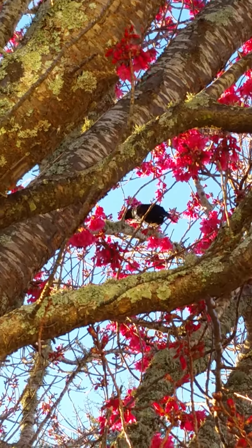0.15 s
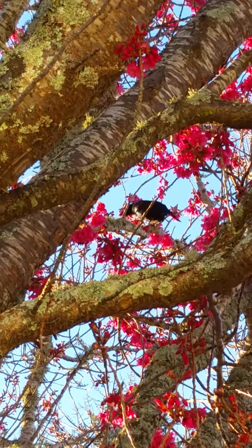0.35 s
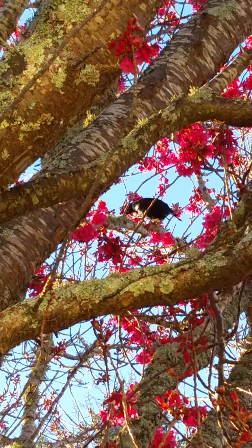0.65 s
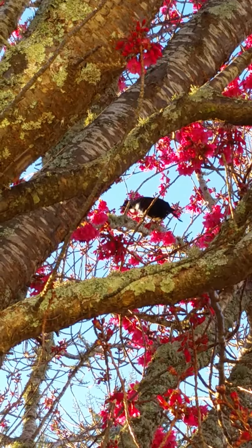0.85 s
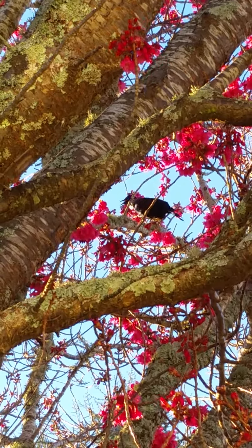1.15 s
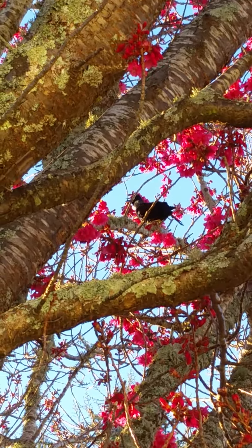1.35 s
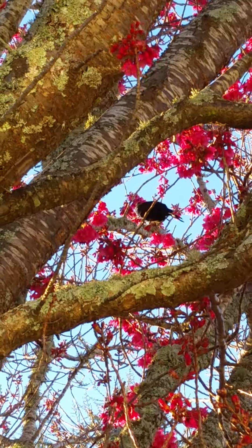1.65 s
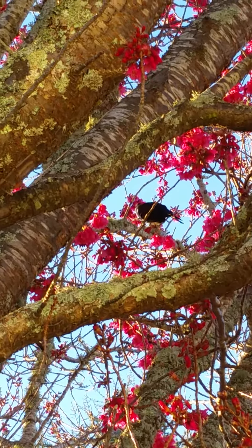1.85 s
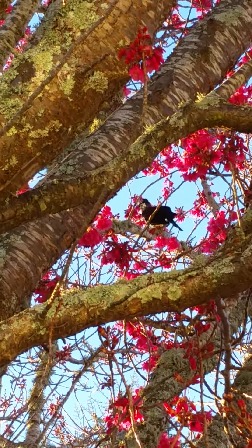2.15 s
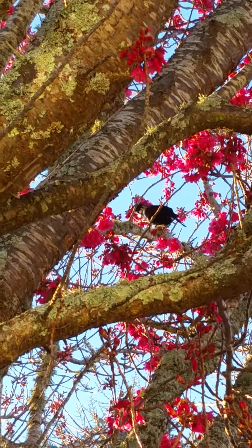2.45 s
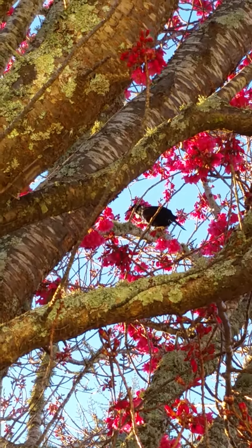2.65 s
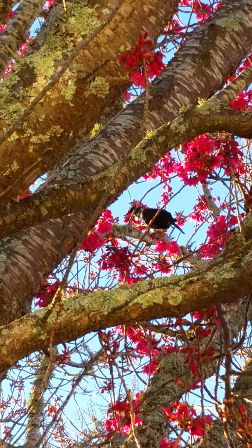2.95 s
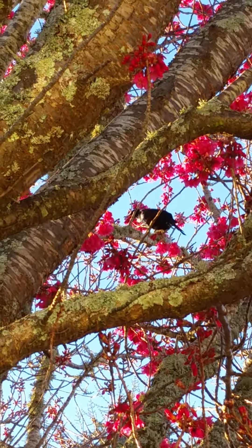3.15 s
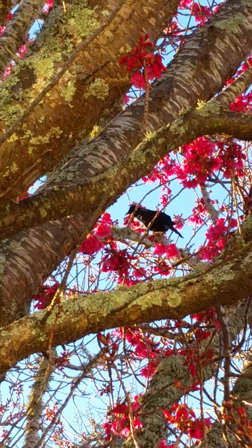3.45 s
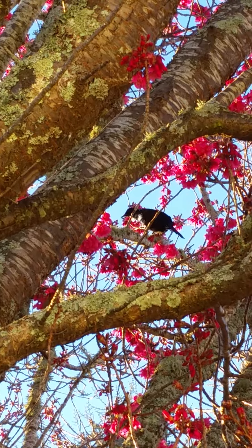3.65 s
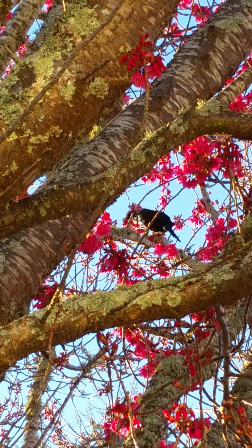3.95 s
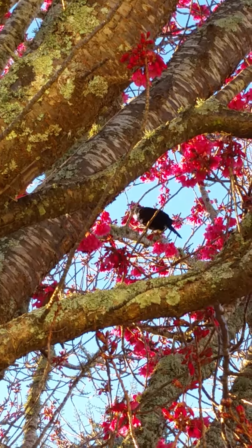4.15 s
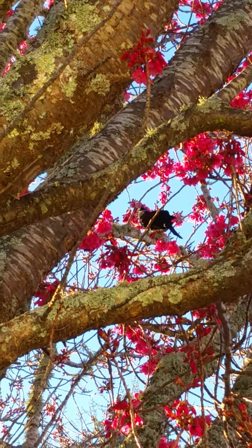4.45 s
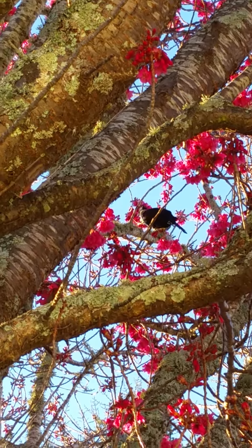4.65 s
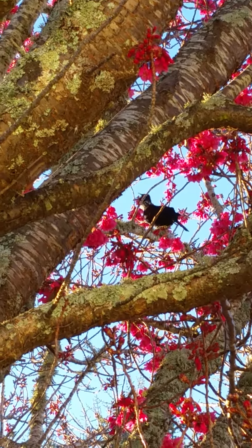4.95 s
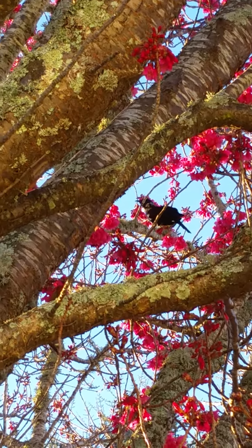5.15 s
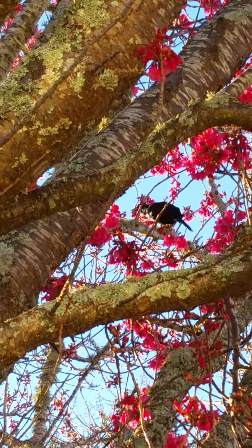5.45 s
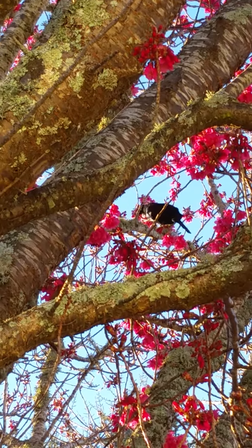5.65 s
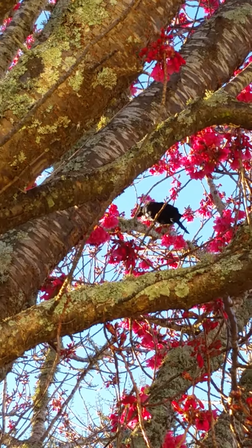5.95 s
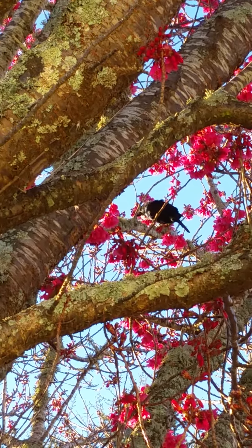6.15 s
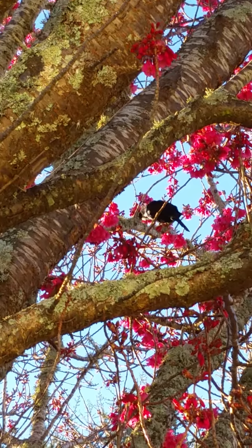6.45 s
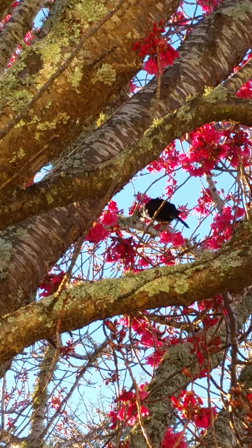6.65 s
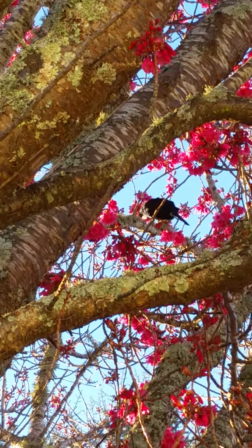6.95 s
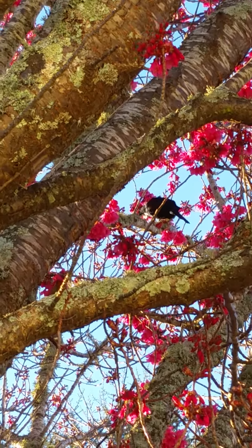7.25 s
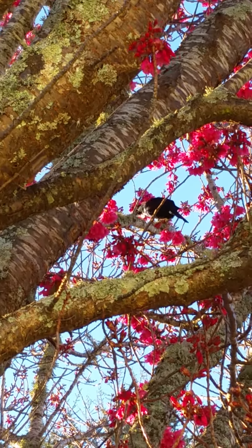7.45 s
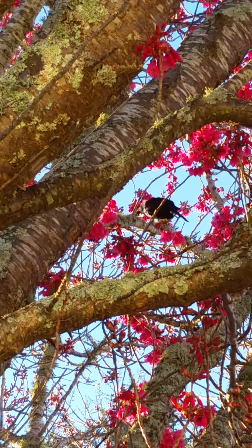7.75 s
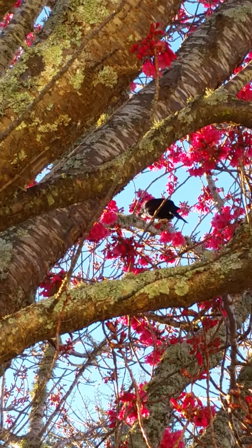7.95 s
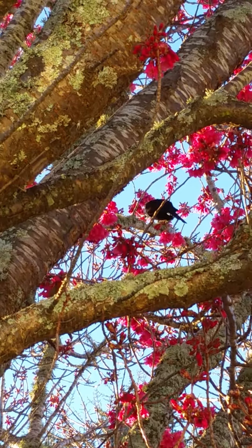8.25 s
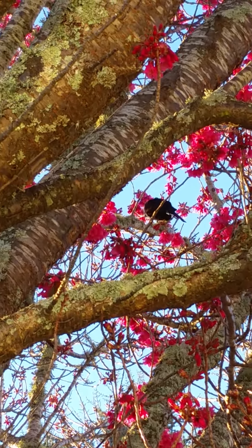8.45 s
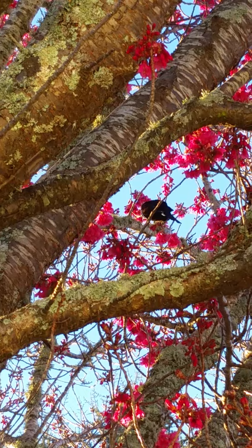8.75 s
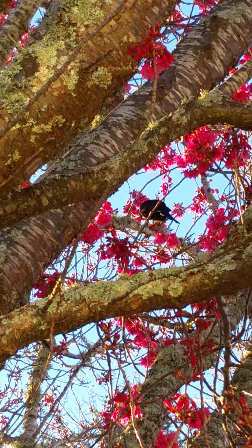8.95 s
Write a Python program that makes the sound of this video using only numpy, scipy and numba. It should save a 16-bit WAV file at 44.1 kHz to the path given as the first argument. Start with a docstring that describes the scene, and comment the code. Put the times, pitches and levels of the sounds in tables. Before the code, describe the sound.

Outdoor stereo phone pickup, bird several metres away and slightly to the right. A snap and chirp lead to a bright double whistle between hoarse, rattling wheezes; low, round notes follow, then another wheeze, one strong whistle and another rasp. A rapid stuttering run comes near six seconds, then faint high squeals and scratchy chirps. Dull rumble lies beneath, with low wind bumps stronger on the left and a quiet engine drone gliding upward.

```python
"""A songbird sings to the right of a phone: the membranes of its syrinx whistle, rasp and chirp, its beak clicks.
Whistles are gliding near sines; rasps are slow beats filling two resonances, with noise hissing through the throat.
Branches scatter the song, walls return dull echoes and a yard prolongs it through coupled delay lines.
Wind buffets the two microphone ports as filtered noise and thumps; far traffic drones as bands of noise,
and the hum of an engine rises slowly in pitch."""
import sys
import numpy as np
from scipy import signal
from scipy.io import wavfile
from scipy.ndimage import uniform_filter1d, map_coordinates
from numba import njit

SR = 44100
rng = np.random.default_rng(int(sys.argv[2]) if len(sys.argv) > 2 else 0)


def transcribe(signal):
    """Save signal, clipped to [-1, 1], as a 16-bit WAV file at the path in sys.argv[1]."""
    frames = np.atleast_2d(signal).T
    limited = np.clip(frames, -1, 1)
    pcm = np.round(limited * 32767).astype(np.int16)
    wavfile.write(sys.argv[1], SR, pcm)


N = 400428
T = np.arange(N) / SR  # time in seconds

# Whistled notes. Each row: start, attack, hold and release in seconds, peak level in dB, first and last
# pitch in Hz, roughness from 0 to 1, half-order line in dB (three-halves lies 12 dB lower), octave in dB.
WHISTLES = [ (0.0, .002, 0.0066, .07, -59, 8270, 8300, 0.49, -59, -40),
            (0.102, 0.035, .004, 0.024, -56, 6630, 6560, 0.18, -58, -43),
            (0.252, 0.03, 0.0043, .04, -59, 6630, 6680, .31, -60, -40),
            (0.406, 0.011, .006, .034, -62.5, 6650, 6770, 0.5, -60, -40),
            (0.838, 0.021, 0.0018, 0.0064, -37, 4070, 3720, .03, -60, -20),
            (0.864, 0.0051, 0.027, 0.026, -40, 3760, 3803, 0.09, -60, -8),
            (0.916, 0.0054, 0.0092, 0.02, -54, 1810, 1910, 0.2, -60, -40),
            (0.854, .042, .004, .026, -56.5, 9300, 8750, 1, -60, -40),
            (1.05, 0.0081, 0.046, 0.17, -70, 8450, 9600, 0.3, -60, -40),
            (1.441, .008, .006, .004, -34, 1300, 1520, .1, -60, -40),
            (1.456, 0.016, 0.003, .008, -25, 1545, 1535, 0.03, -40, -36),
            (1.476, 0.013, .002, 0.01, -26.5, 1540, 1540, 0.03, -38, -32),
            (2.408, 0.022, 0.082, 0.037, -30, 1425, 1430, .02, -18, -50),
            (2.419, 0.024, .01, .12, -65.5, 4900, 4980, 0.74, -58, -38),
            (2.751, 0.0062, 0.0035, 0.013, -28.5, 1777, 1740, 0.06, -17, -50),
            (2.773, .005, .006, .008, -33, 1750, 1740, .1, -30, -50),
            (2.768, .003, .01, .006, -35.5, 1720, 1046, .02, -12, -42),
            (2.787, 0.009, .014, 0.018, -40, 1073, 1070, 0, -8, -38),
            (3.18, .006, 0.058, 0.077, -61, 2480, 2350, 0.47, -39, -4.5),
            (3.228, 0.055, 0.025, 0.07, -28, 1205, 1197, 0.04, -35.5, -40),
            (3.719, .02, 0.0036, 0.063, -63.5, 5280, 5170, 0.16, -60, -37),
            (3.752, .012, 0.11, 0.036, -41, 1040, 1023, 0, -42, -26),
            (3.757, 0.066, 0.0091, 0.048, -44, 922, 887, 0.1, -45, -42),
            (4.452, .012, .008, .006, -34, 1260, 1420, .1, -60, -40),
            (4.472, 0.016, 0.004, 0.014, -22, 1435, 1430, 0.03, -44, -38),
            (4.652, 0.062, .008, .014, -74, 11150, 9400, .1, -60, -40),
            (4.822, .004, .004, 0.064, -62, 4070, 4080, 0.3, -60, -40),
            (4.883, .04, .004, .004, -63.5, 4150, 4080, .2, -60, -40),
            (5.387, .03, .004, 0.022, -38.5, 1763, 1833, 0.2, -35, -36),
            (5.468, 0.067, 0.0071, 0.038, -57, 6500, 8860, .7, -63, -45),
            (5.628, 0.04, 0.0028, 0.068, -44, 6480, 6510, 0.12, -57, -34),
            (5.822, .006, .015, .015, -67, 5150, 5150, .6, -60, -40),
            (5.866, .007, .022, .015, -57, 5150, 5100, .5, -60, -40),
            (5.917, .008, .018, .012, -59, 5050, 5050, .6, -60, -40),
            (5.963, .007, .014, .012, -56, 4900, 4850, .5, -60, -40),
            (6.003, .01, .014, .01, -59, 4950, 4900, .7, -60, -40),
            (6.037, 0.019, .002, 0.04, -52, 4880, 4950, 0.45, -58, -33.5),
            (5.897, 0.0071, 0.014, .015, -48.5, 1110, 1100, 0.1, -66, -41.5),
            (5.94, .012, .006, .014, -34.5, 1145, 1123, 0.08, -63, -38),
            (5.983, 0.012, 0.0066, .014, -32, 1135, 1140, 0.1, -60, -39.5),
            (6.027, 0.011, 0.0062, 0.012, -32, 1125, 1135, 0.03, -58, -41),
            (6.407, .014, 0.012, .006, -54, 1880, 2330, 0.15, -60, 3),
            (6.431, 0.012, 0.018, .022, -49, 2400, 2470, 0.15, -60, -5),
            (6.98, .05, .006, .065, -65.5, 4970, 4990, 0.5, -55, -43),
            (6.95, 0.0055, 0.11, 0.015, -69.5, 13650, 13330, 0.5, -60, -38.5),
            (7.064, .008, 0.18, 0.014, -66, 13460, 12300, .42, -57, -40),
            (7.252, .006, .006, 0.059, -60, 12300, 12760, 0.15, -62, -41),
            (7.307, .01, 0.095, .006, -62.5, 12340, 12330, 0.2, -58, -40),
            (7.41, .006, .08, .006, -65, 12300, 13700, 0.2, -62, -40),
            (7.498, 0.0065, 0.13, 0.084, -64.5, 13800, 11300, 0.2, -60, -38),
            (7.28, .06, .07, .012, -71, 13340, 13320, .2, -60, -38),
            (7.458, 0.02, .04, 0.044, -63, 12700, 12180, 0.2, -62, -40),
            (7.128, .046, 0.0043, .04, -66, 3610, 3800, .95, -60, -47),
            (7.412, 0.012, 0.018, .016, -57.5, 2170, 1900, 0.1, -60, -43),
            (7.495, 0.043, 0.14, 0.017, -60, 6140, 6070, 0.24, -60, -50),
            (7.545, .02, .004, .045, -65, 9400, 9140, .8, -60, -40),
            (7.877, .023, .02, 0.014, -60, 4400, 4200, 0.5, -60, -40),
            (7.858, 0.03, 0.03, .03, -53, 5200, 5450, 0.35, -60, -21),
            (7.944, .008, .006, .012, -62, 9500, 12400, .2, -60, -40),
            (7.962, .006, .006, .012, -57, 4950, 4850, .3, -60, -40),
            (8.146, .008, .015, .02, -69, 3000, 3020, .2, -60, -40),
            (8.28, .012, .025, .03, -69, 3020, 3040, .2, -60, -40),
            (8.537, 0.021, 0.0041, 0.051, -55.5, 7000, 7150, 0.06, -55, -45.5),
            (8.553, 0.027, .004, .05, -73, 10530, 10400, 0, -61, -40),
            (8.687, 0.03, .004, .046, -67, 2547, 2490, 0.13, -56, 11.5),
            (8.798, 0.022, .01, 0.049, -46.5, 3600, 3700, .05, -57, -40),
            (8.966, 0.043, .002, 0.016, -55.5, 5100, 6270, 0.4, -58, -33),
            (9.032, .028, 0.012, .002, -61, 5330, 5450, 0.14, -60, -33), ]
# Direction of the beak. Each row: time in seconds, left minus right in dB, share sent to the walls in dB,
# mean lag at the left port in ms.
BEAK_DIRECTION = [(0.85, -4.5, 1, 0.045), (1.3, -7, -1, 0.16), (1.5, -6.5, -0.5, 0.08),
                  (2.03, -5.5, 0, 0.12), (2.47, -2.5, -2.5, 0.084), (2.76, -5, 1, .15),
                  (3.3, 4, -5, -0.038), (3.8, -5.5, -10, 0.27), (4.3, -5.5, -0.5, 0.2),
                  (4.5, -6, -2, 0.077), (4.98, -4.5, 0, 0.04), (5.42, -5, -5.5, 0.1), (5.7, -6, -3, .05),
                  (6.0, -6.5, -8, 0.17), (6.45, -3.5, -3, 0.0076), (7.401, -6.5, 1, 0.038),
                  (8.3, -7.5, -1.5, .025), (8.85, -2.5, -3, 0.031)]
# Wall reflections. Each row: delay in seconds, left and right level in dB before the treble loss.
WALL_ECHOES = [(0.056, -21, -20), (.097, -15, -15), (.14, -19, -17), (.25, -17, -16)]
# Breeze on the ports. Each row: time in seconds, relative level in dB, left minus right in dB before the limit.
BREEZE = [(0.0, -19.5, 21.5), (0.034, -40, 16.5), (0.24, -41.5, 4.5), (0.4, -64, -1), (4.8, -69.5, 2.5),
          (5.0, -46.5, 6), (5.2, -39.5, -3), (5.6, -31, -2), (6.3, -32.5, 3), (6.85, -34, -5),
          (7.2, -37.5, -2), (7.66, -34.5, 0), (7.9, -40, 2), (8.1, -66, -2), (8.299, -54, -2.5),
          (8.45, -35, 6.5), (8.62, -36.5, 4.5), (8.8, -33, -7.5), (9.08, -33, 1.5)]
# Eddies that hit a port. Each row: time in seconds, relative level in dB, left minus right in dB before
# the limit, pitch of the thump in Hz.
PORT_EDDIES = [(0.064, -14, 20, 107.5), (0.105, -25.5, 22, 110), (0.847, -29, -20, 151),
               (5.046, -31, 16.5, 90), (5.132, -29, 13, 110), (5.331, -31, 9, 90), (5.43, -16, 26.5, 102),
               (5.625, -15, 13.5, 128), (5.788, -18, 18, 122), (5.926, -20.5, 26, 93),
               (6.141, -15.5, 27, 196), (6.494, -23, 13, 106), (6.632, -27, 11, 90),
               (6.76, -17, 21.5, 81.3), (7.029, -24.5, 10, 90), (7.282, -16, 20.5, 87.3),
               (7.391, -24.5, 16, 82.6), (7.479, -24.5, 8.5, 126), (8.413, -24, 17, 89),
               (8.505, -27.5, 5.5, 90), (8.676, -15, 22, 81), (8.685, -7, 17, 147),
               (8.718, -12.5, 9.5, 89.2), (8.804, -18.5, 3.5, 80), (8.885, -9, 32.5, 206),
               (9.05, -25.5, 10.5, 91)]
# Spectrum of far traffic and microphone hiss. Each row: frequency in Hz, relative density in dB per Hz.
TOWN_SPECTRUM = [(15, -51), (25, -19.5), (101, -0.5), (133, -8), (168, -9.5), (498, -19.5), (549, -20),
                 (764, -15), (1420, -22.5), (1540, -25), (2600, -45), (3100, -47.5), (3800, -40),
                 (4500, -44), (6000, -59.5), (9500, -58), (11500, -63.5), (14500, -36.5)]
# Likeness of the ports in that noise. Each row: frequency in Hz, left-right correlation from -1 to 1.
PORT_CORRELATION = [(60, 0.32), (130, 1), (290, 0.8), (630, 0.84), (1370, 0.038), (2990, -0.093),
                    (6530, 0.027), (14300, -0.1)]
# Snaps of the beak. Each row: start in seconds, level in dB of the noise before its band filter, centre in Hz,
# width in Hz, decay in seconds.
BEAK_CLICKS = [(0.843, -30.5, 2000, 700, .006), (6.481, -38, 4000, 5000, 0.0021),
               (6.481, -23, 1500, 600, .003)]
# Swell of the rasps. Each row: start, swell and fade in seconds, relative peaks of the upper resonance, lower
# resonance and hiss in dB, rise of the upper in dB, falls of upper, lower and hiss in dB.
RASP_SWELLS = [(1.2, 0.071, 0.19, -26, -31.5, -37, 5.5, 18, 5, 11.2),
               (1.977, 0.06, 0.075, -34, -34.5, -38.5, 9, 26, 30, 18),
               (4.226, 0.055, .2, -26.5, -32, -37.5, 3, 17, 7, 10.5),
               (4.941, .045, .075, -37, -35, -38, 7, 26, 28, 16),
               (7.946, 0.04, 0.05, -59, -66, -55.5, 8, 12, 12, 14)]
# Voice of each rasp. Each row: upper resonance start and end in Hz, lower resonance start and end in Hz,
# beat start, middle and end in Hz, roughness from 0 to 1, foot and top of the hiss in Hz, beak ring in dB.
RASP_TIMBRES = [(1830, 1560, 1290, 1200, 130.5, 128, 124, 0.2, 1230, 13200, 1.2),
                (1700, 1750, 1250, 1350, 125, 125, 120, 0.7, 1500, 9080, 5.5),
                (1870, 1600, 1270, 1200, 133, 125.5, 130, 0.2, 1400, 11900, 1.2),
                (2300, 2150, 1300, 1350, 125, 125, 120, 0.7, 1500, 9300, 5.5),
                (5400, 5000, 4400, 4600, 125, 125, 120, 0.9, 4300, 12800, 5)]
# Resonances of the throat. Each row: centre in Hz, width in Hz, relative level in dB.
THROAT = [(1706, 840, 8), (2550, 450, -1.5), (3083, 170, 2.5), (3720, 520, 0), (4260, 310, -4.5),
          (5136, 590, 3), (7170, 1780, -2.5), (9800, 2200, -3), (12500, 1560, -5.5)]
# Hum of the engine. Each row: time in seconds, pitch in Hz, level in dB before the trim of the ports.
ENGINE_HUM = [(3.8, 107.9, -57), (4.7, 116, -45.5), (6.1, 123, -34), (6.5, 126.4, -39.5),
              (7.5, 132.6, -37.5), (8.3, 136.8, -34.5), (8.7, 136.6, -45)]
# Harsh chirps. Each row: start in seconds, level in dB before the envelope, settled pitch of the main line in Hz,
# lift of the lines below it in dB, excess of the first pitch as a share (negative: the pitch rises).
HARSH_CHIRPS = [(8.159, -46, 7150, 6, .03), (8.2273, -43, 6950, -2, -.025), (8.298, -40, 7100, 0, .01)]
# Lines of a chirp. Each row: multiple of the main line, relative level in dB.
CHIRP_LINES = [(1 / 3, -13), (2 / 3, -2), (1, 0), (4 / 3, -20.5), (1.62, -13.5)]

# whistles
NOTE_RISE_DB, NOTE_FALL_DB = 11.5, 10  # swell in the attack, sinking in the release
NOTE_EDGE_S = 0.0027  # soft start and end
PITCH_PER_DB = .002  # share by which a whistle goes flat for each dB under its peak
# path to the left port
LEFT_SHADE_DB, LEFT_SHADE_HZ = -8, 3620  # the phone's body shades the treble
LEFT_WANDER_MS, LEFT_WANDER_HZ = .075, 25  # moving leaves and air: spread and rate of the shifting lag
# surroundings
BRANCHES_S, BRANCHES_DB = 0.022, (-7.5, -10)  # decay, (left, right) level
ECHO_TOP_HZ = 3600  # walls and hedges return mostly the lower pitches
YARD_T60_S, YARD_DAMP, YARD_DB = 1.19, 0.22, -16.5  # decay of the bass, loss of treble per round, level
YARD_LEFT_DB = -6  # the phone's body shades the far port from the reverberation
YARD_SPREAD_S = .015  # rough surfaces blur what enters the yard
YARD_WAVER_MS, YARD_WAVER_HZ = .25, 30  # stirring foliage keeps shifting the long paths
# wind
PORT_LEAD_DB = 5  # most that the exposed port gains
WAKE_RISE_S, WAKE_S = .01, 0.039  # build-up and trail of the turbulence around an eddy
WAKE_DB, WAKE_TOP_DB = -8.5, -26  # level against the eddy, ceiling before the share of each port
# distance
TOWN_DB, DISTANT_PAN_DB = -41, -2.5  # noise before the trim; left minus right, engine included
# rasps
RASP_ATTACK_S, RASP_ATTACK_DB = 0.0035, 16.5
LOWER_RISE_DB, HISS_RISE_DB = 9.5, 12  # the latter for a swell of RISE_FULL_S
RISE_FULL_S = .065  # a shorter swell starts its hiss nearer the peak
HISS_HOLD = 2.1  # exponent; above 1 the hiss holds up and drops late
UPPER_WIDTH_HZ, LOWER_WIDTH_HZ = 85, 85  # half-widths; the upper one doubles through a rasp
ROUGH_WIDTH_HZ = 170  # extra half-width at full roughness
LINE_FLICKER_DB, LINE_FLICKER_HZ = 3.5, 60  # each line wavers alone: spread, rate
BEAT_JITTER = .12  # share by which a fully rough beat shakes
SECOND_ORDER_DB, THIRD_ORDER_DB = -7, -8  # mixing tones before their swell; rough rasps mix less
HISS_FLUTTER = 0.22  # depth of the beat in the hiss
RING_HZ = 4920  # an open beak lifts this band
GAPE_HZ, GAPE_DB = 4350, 16  # a fully rough rasp opens with this band lifted
# receiver
TOP_HZ = 14750


def undb(db):
    """Decibel law: amplitude ratio of a level in dB."""
    return 10 ** (np.asarray(db) / 20)


def level(x, db):
    """Mean-square law: scale a signal to a root-mean-square level in dB."""
    return x * undb(db) / np.sqrt(np.mean(x ** 2))


def on_log(table, hz):
    """Logarithmic frequency scale: read a table between its rows."""
    f, v = np.transpose(table)
    return np.interp(np.log(hz), np.log(f), v)


def band(x, hz, width, order=2):
    """Band-pass resonance: edges lie evenly about the centre on a logarithmic scale."""
    lo = np.sqrt(hz ** 2 + width ** 2 / 4) - width / 2
    hi = min(lo + width, .49 * SR)
    return signal.sosfilt(signal.butter(order, [lo, hi], "bandpass", fs=SR, output="sos"), x)


def walk(rate, size=N):
    """Slow random modulation: levels held 1 / rate s and slewed twice; spread near 1."""
    k = max(int(SR / rate), 1)
    steps = np.repeat(rng.standard_normal(size // k + 1), k)
    return 1.36 * uniform_filter1d(uniform_filter1d(steps, k), k)[:size]


def play(rows, fade_s=0.0019):
    """Envelope interpolation: a table's span, a gate with soft ends, its columns by the sample."""
    s, *columns = np.transpose(rows)
    span = slice(int(s[0] * SR), min(int(s[-1] * SR), N))
    t = T[span]
    gate = np.clip(np.minimum(t - s[0], s[-1] - t) / fade_s, 0, 1)
    return span, gate, [np.interp(t, s, c) for c in columns]


def voice(hz, rough, orders):
    """Periodic oscillation: near sines; roughness shakes the pitch and smears each line into a band."""
    turn = 2 * np.pi * np.cumsum(hz * (1 + 0.018 * rough * walk(300, size=len(hz)))) / SR
    share = np.clip(rough, 0, 1)
    real, imag = [np.sqrt(share / 2) * walk(.15 * hz.mean(), size=len(hz)) for _ in range(2)]
    size = np.sqrt(1 - share) + real + 1j * imag
    lines = [undb(db) * (size * np.exp(1j * k * turn)).imag
             for k, db in orders if k * hz.max() < .45 * SR]
    return np.sqrt(2) * sum(lines)


def notes():
    """Oscillation of a membrane: gliding whistles, with an octave and the half lines of an alternating cycle."""
    out = np.zeros(N)
    for start, attack, hold, release, db, first_hz, last_hz, rough, half_db, octave_db in WHISTLES:
        s = start + np.cumsum(np.abs([0, attack, hold, release]))
        pitch = np.interp(s, s[[0, -1]], [first_hz, last_hz])
        swell = [-NOTE_RISE_DB, 0, 0, -NOTE_FALL_DB]
        span, gate, (hz, swell_db) = play(np.transpose([s, pitch, swell]), fade_s=NOTE_EDGE_S)
        orders = [(.5, half_db), (1, 0), (1.5, half_db - 12), (2, octave_db)]
        tone = voice(hz * (1 + PITCH_PER_DB * swell_db), rough, orders)
        out[span] += gate * undb(db + swell_db) * tone
    return out


def direct_sound(bird):
    """Diffraction and path difference: the left port hears the song shaded and with a wandering lag."""
    s, pan_db, _, lag_ms = np.transpose(BEAK_DIRECTION)
    pan_db = np.interp(T, s, pan_db)
    dull = signal.sosfilt(signal.butter(1, LEFT_SHADE_HZ, fs=SR, output="sos"), bird)
    shaded = dull + undb(LEFT_SHADE_DB) * (bird - dull)
    lag_s = (np.interp(T, s, lag_ms) + LEFT_WANDER_MS * walk(LEFT_WANDER_HZ)) / 1000
    left = map_coordinates(shaded, [(T - lag_s) * SR])
    return np.array([left * undb(pan_db / 2), bird * undb(-pan_db / 2)])


def scatter(db, decay_s):
    """Diffuse reflection: a decaying burst of many small returns."""
    burst = np.exp(-T[:SR // 10] / decay_s) * rng.standard_normal(SR // 10)
    return undb(db) * burst / np.linalg.norm(burst)


def branches(bird):
    """Scattering: branches spread the song at once, independently for the two ports."""
    bursts = np.array([scatter(db, BRANCHES_S) for db in BRANCHES_DB])
    return signal.oaconvolve(bird[None], bursts)[:, :N]


def wall_echoes(sent):
    """Specular reflection: each wall returns a dull copy, with its own small lag at the left port."""
    tail = np.zeros((2, SR // 2))
    for s, left_db, right_db in WALL_ECHOES:
        tail[0, int(s * SR) + rng.integers(-3, 4)] = undb(left_db)
        tail[1, int(s * SR)] = undb(right_db)
    tail = signal.sosfilt(signal.butter(2, ECHO_TOP_HZ, fs=SR, output="sos"), tail)
    return signal.oaconvolve(sent[None], tail)[:, :N]


@njit
def delay_network(x, lags, gain, damp):
    """Multiple reflection: eight delay lines feed each other, duller on every round."""
    line, soft, out = np.zeros((8, 8192)), np.zeros(8), np.zeros((2, len(x)))
    for i in range(len(x)):
        total = 0.
        for k in range(8):
            soft[k] += (1 - damp) * (gain[k] * line[k, (i - lags[k]) & 8191] - soft[k])
            total += soft[k]
            out[k % 2, i] += soft[k]
        for k in range(8):
            line[k, i & 8191] = x[i] + soft[k] - total / 4
    return out


def yard(sent):
    """Reverberation: blurred song circulates and decays while its long paths waver."""
    lags = rng.integers(900, 5000, 8)
    gain = undb(-60 * lags / SR / YARD_T60_S)
    blurred = signal.oaconvolve(sent, scatter(0, YARD_SPREAD_S))[:N] + 1e-18  # keeps the loops off denormals
    ringing = delay_network(blurred, lags, gain, YARD_DAMP)
    out = []
    for side in ringing:
        shift_s = YARD_WAVER_MS / 1000 * walk(YARD_WAVER_HZ)
        out.append(map_coordinates(side, [(T + shift_s) * SR], order=1))
    return undb(YARD_DB) * np.array(out) * undb([[YARD_LEFT_DB], [0]])


@njit
def lowpass(x, hz):
    """Successive integration: four one-pole stages with a moving corner."""
    y, z = np.empty(len(x)), np.zeros(4)
    for i in range(len(x)):
        a, v = 1 - np.exp(-2 * np.pi * hz[i] / SR), x[i]
        for k in range(4):
            z[k] += a * (v - z[k])
            v = z[k]
        y[i] = v
    return y


def port_db(side, pan_db):
    """Exposure: a port's share of a level difference, its gain limited."""
    return np.minimum(side * pan_db, PORT_LEAD_DB)


def turbulence(side):
    """Turbulent pressure: noise that reaches higher as the breeze and the wakes of eddies strengthen."""
    s, breeze_db, pan_db = np.transpose(BREEZE)
    power = undb(2 * np.interp(T, s, breeze_db + port_db(side, pan_db)))
    for at, db, eddy_pan_db, _ in PORT_EDDIES:
        near = slice(max(int((at - .2) * SR), 0), int((at + .2) * SR))
        t = T[near] - at
        wake_db = min(db + WAKE_DB, WAKE_TOP_DB) + port_db(side, eddy_pan_db)
        power[near] += undb(2 * wake_db) * np.exp(-(t / np.where(t < 0, WAKE_RISE_S, WAKE_S)) ** 2)
    corner_hz = np.clip(158.0 + 5 * (10 * np.log10(power) + 30), 60, 500)
    gusty = undb(3.36 * walk(30)) * rng.standard_normal(N)
    air = lowpass(gusty, corner_hz) / np.sqrt(corner_hz)
    # the microphone drops the deepest part
    air = signal.sosfilt(signal.butter(3, 48, "highpass", fs=SR, output="sos"), air)
    return np.sqrt(power) * level(air, 1.18)


def wind():
    """Flow noise at the ports: turbulence unrelated left and right, with the thumps of eddies."""
    sides = (.5, -.5)
    out = np.array([turbulence(side) for side in sides])
    t = T[:SR // 10] - .02
    for s, db, pan_db, hz in PORT_EDDIES:
        thump = np.exp(-(t * hz / 0.41) ** 2) * np.cos(2 * np.pi * hz * t - .6)
        # the harder the eddy, the sharper its crest
        crest = np.gradient(np.exp(-(t / 0.00081) ** 2), t / 0.00068)
        thump -= undb(1.48 * (db + 11.5) - 5.5) * crest
        for ch, side in enumerate(sides):
            into = out[ch, int((s - .014) * SR):][:len(t)]
            into += undb(db + port_db(side, pan_db)) * thump[:len(into)]
    return out


def town():
    """Partly coherent noise: traffic and microphone hiss in third-octave bands that swell together, flicker alone."""
    out, swell = 0, walk(.7)
    noise = rng.standard_normal((2, N))
    for hz in 25 * 2 ** np.arange(0, 9.3, 1 / 3):
        mid, side = band(noise, hz, hz / 4.3, order=3)
        c = np.clip(on_log(PORT_CORRELATION, hz), -.95, .95)
        db = on_log(TOWN_SPECTRUM, hz) + .6 * swell + 1.3 * walk(5)
        out = out + undb(db) * (np.sqrt(1 + c) * mid + np.sqrt(1 - c) * side * np.array([[1], [-1]]))
    return level(out, TOWN_DB)


def clicks():
    """Impulsive excitation: dry snaps of the beak, as decaying bands of noise."""
    out, t = np.zeros(N), T[:SR // 10]
    for s, db, hz, width_hz, decay_s in BEAK_CLICKS:
        snap = band(rng.standard_normal(len(t)), hz, width_hz, order=1)
        out[int(s * SR):][:len(t)] += undb(db) * np.exp(-t / decay_s) * snap
    return out


def effort(start, swell, fade, upper_db, lower_db, hiss_db, rise_db,
           upper_fall_db, lower_fall_db, hiss_fall_db):
    """Driving pressure: a quick attack, a swell to the peak, then each part fades at its own pace."""
    s = start + np.array([0, RASP_ATTACK_S, swell, swell + fade])
    rows = np.transpose([s, [1, 0, 0, 0], [1, 1, 0, 0], [0, 0, 0, 1]])
    span, gate, (shut, rising, falling) = play(rows)
    onset_db = RASP_ATTACK_DB * shut
    hiss_rise_db = HISS_RISE_DB * swell / RISE_FULL_S
    upper = upper_db - onset_db - rise_db * rising - upper_fall_db * falling
    lower = lower_db - onset_db - LOWER_RISE_DB * rising - lower_fall_db * falling
    hiss = hiss_db - onset_db - hiss_rise_db * rising - hiss_fall_db * falling ** HISS_HOLD
    return span, gate, (upper, lower, hiss)


def overtones(rate, beat, rough):
    """Harmonic series: close overtones of the slow beat, each wavering alone."""
    lines, size = [], len(rate)
    for k in range(7, 48):
        flicker = undb(LINE_FLICKER_DB * walk(LINE_FLICKER_HZ, size=size))
        phase = k * beat + 3 * walk(45, size=size) * rough + k * k / 4
        lines.append((k * rate, flicker * np.sin(phase)))
    return lines


def windpipe(lines, hz, half_width):
    """Resonance: overtones near the centre pass, those away from it weaken."""
    return level(sum(line / (1 + ((f - hz) / half_width) ** 4) for f, line in lines), 0)


def throat_hiss(beat, u, rough, foot_hz, top_hz, ring_db):
    """Turbulent jet: fluttering noise shaped by the throat, the ring of the beak and a rough opening."""
    air = (1 + HISS_FLUTTER * np.cos(beat)) * rng.standard_normal(len(u))
    hiss = sum((-1) ** k * undb(db) * band(air, f, w) for k, (f, w, db) in enumerate(THROAT))
    ring = (undb(ring_db) - 1) * band(hiss, RING_HZ, 800)
    gape = (undb(GAPE_DB * rough * (1 - u) ** 2) - 1) * band(hiss, GAPE_HZ, 400)
    edges = signal.butter(5, [foot_hz, top_hz], "bandpass", fs=SR, output="sos")
    return level(signal.sosfilt(edges, hiss + ring + gape), 2.0)


def rasps():
    """Source and filter: a slow syrinx beat fills two gliding resonances that mix, while air hisses."""
    out = np.zeros(N)
    for swell, timbre in zip(RASP_SWELLS, RASP_TIMBRES):
        up0, up1, low0, low1, rate0, rate_mid, rate1, rough, foot_hz, top_hz, ring_db = timbre
        span, gate, (upper_db, lower_db, hiss_db) = effort(*swell)
        u = np.linspace(0, 1, len(gate))  # progress through the rasp
        rate = np.polyval(np.polyfit([0, .5, 1], [rate0, rate_mid, rate1], deg=2), u)
        shake = 1 + BEAT_JITTER * rough ** 2 * walk(150, size=len(u))
        beat = 2 * np.pi * np.cumsum(rate * shake) / SR
        lines = overtones(rate, beat, rough)
        extra_hz = ROUGH_WIDTH_HZ * rough
        upper = windpipe(lines, up0 + (up1 - up0) * u, UPPER_WIDTH_HZ * (1 + u) + extra_hz)
        lower = windpipe(lines, low0 + (low1 - low0) * u, LOWER_WIDTH_HZ + extra_hz)
        # sum tones of the two resonances
        second = level(band(upper * lower, 3030, 250), SECOND_ORDER_DB) * (1 - rough)
        bent = np.tanh(1.5 * (upper + lower))
        third = level(band(bent, 4700, 1700, order=3), THIRD_ORDER_DB) * (1 - rough)
        hiss = throat_hiss(beat, u, rough, foot_hz, top_hz, ring_db)
        # the third order follows half the swing of the upper resonance in dB
        prompt_db = hiss_db.max() + .5 * (upper_db - upper_db.max())
        rasp = undb(upper_db) * upper + undb(lower_db) * lower
        rasp += undb(hiss_db) * (hiss + second) + undb(prompt_db) * third
        out[span] += gate * rasp
    return out


def engine():
    """Periodic excitation: one slightly rough tone follows the speed of a far engine."""
    out = np.zeros(N)
    span, gate, (hz, db) = play(ENGINE_HUM, fade_s=0.083)
    out[span] = gate * undb(db) * voice(hz, 0.044, [(1, 0)])
    return out


def chirps():
    """Rough oscillation: short stacks of lines with a quick start and an exponential decay."""
    out, t = np.zeros(N), T[:SR // 10]
    for s, db, hz, low_db, sag in HARSH_CHIRPS:
        orders = [(k, k_db + low_db * (k < .9)) for k, k_db in CHIRP_LINES]
        envelope = (1 - np.exp(-t / 0.0056)) * np.exp(-t / 0.014)
        stack = voice(hz * (1 + sag * np.exp(-t / .015)), 0.25, orders)
        out[int(s * SR):][:len(t)] += undb(db) * envelope * stack
    return out


def scene():
    """Superposition: direct song, its reflections, wind and distant sounds add at the two ports."""
    bird = notes() + clicks() + rasps() + chirps()
    s, _, walls_db, _ = np.transpose(BEAK_DIRECTION)
    sent = bird * undb(np.interp(T, s, walls_db))
    song = direct_sound(bird) + branches(bird) + wall_echoes(sent) + yard(sent)
    distant = (town() + engine()) * undb([[DISTANT_PAN_DB / 2], [-DISTANT_PAN_DB / 2]])
    return song + wind() + distant


def record(dry):
    """Saturation and band limit: the phone rounds the hardest peaks and cuts the top."""
    rounded = .96 * np.tanh(dry / .96)
    return signal.sosfilt(signal.ellip(10, .2, 70, TOP_HZ, fs=SR, output="sos"), rounded)


dry = scene()
out = record(dry)
transcribe(out)
```